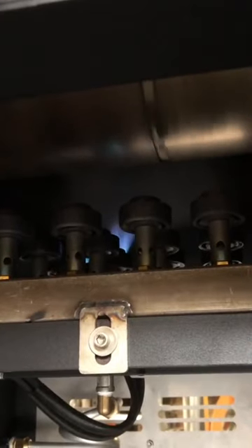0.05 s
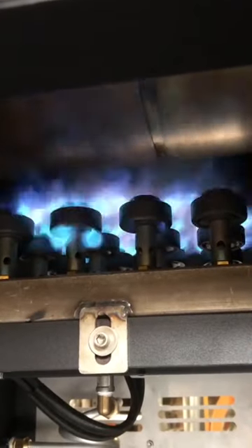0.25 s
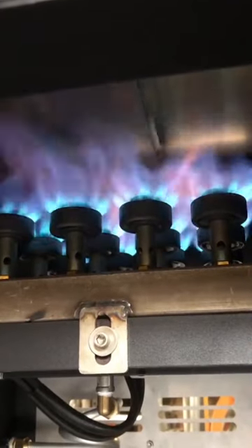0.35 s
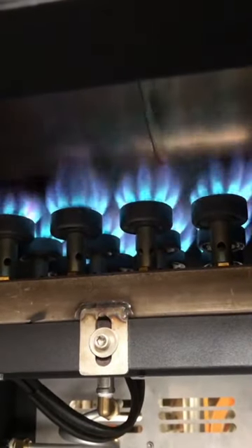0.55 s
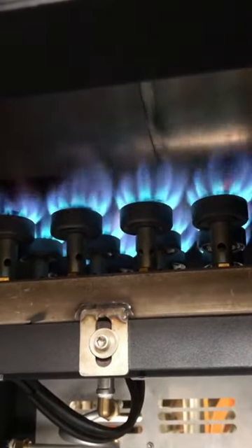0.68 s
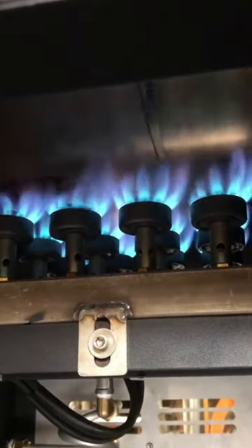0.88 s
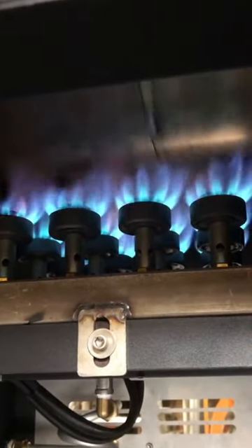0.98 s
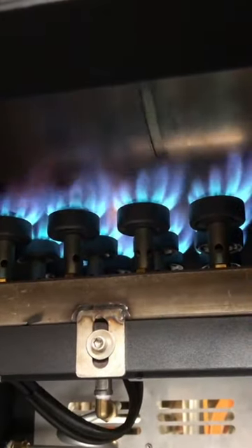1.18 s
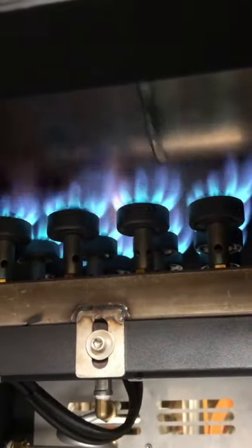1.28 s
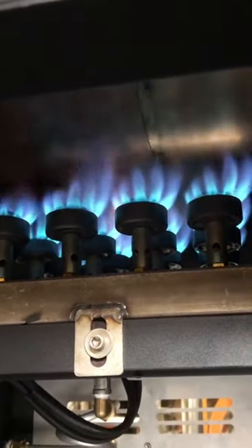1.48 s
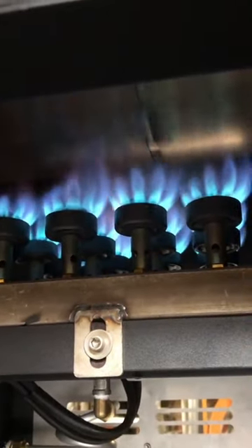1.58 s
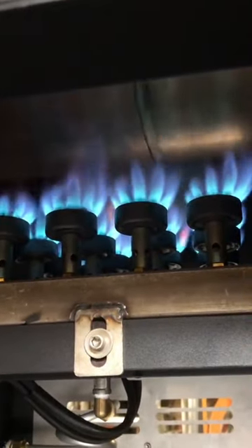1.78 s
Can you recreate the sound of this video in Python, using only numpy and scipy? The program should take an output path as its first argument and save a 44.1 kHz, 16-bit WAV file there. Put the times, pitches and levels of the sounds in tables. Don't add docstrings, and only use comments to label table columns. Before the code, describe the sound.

Gas burners lighting inside a steel cabinet: a loud metallic valve clack with quick rebounds, a fluttering low whump, then a steady low flame roar with faint hiss, over constant fan hum, heard close in mono.

```python
import sys
import numpy as np
from scipy import signal
from scipy.fft import rfft, irfft
from scipy.io import wavfile
from scipy.ndimage import uniform_filter1d, map_coordinates

SR = 44100
rng = np.random.default_rng(int(sys.argv[2]) if len(sys.argv) > 2 else 0)


def file_out(sig):
    cols = np.atleast_2d(sig).T
    lim = np.clip(cols, -1, 1)
    pcm = np.round(lim * 32767).astype(np.int16)
    wavfile.write(sys.argv[1], SR, pcm)


def makeup_ratio(level_db):
    decades = np.asarray(level_db, float) / 20
    return 10 ** decades


N = 81585

# (frequency [Hz], width [Hz], gain [dB])
CABINET_MODES = [(72.9, 7.8, 9.5), (111, 72, -0.5), (182.2, 14.2, -13.5), (204.6, 13, 9.5),
                 (260.4, 17.2, -19.5), (282.7, 23.6, 11.5), (501, 31, 7.5), (646, 7.4, -6)]


def unit(x):
    return x / np.sqrt(np.mean(x ** 2) + 1e-20)


def along(points, hz):
    f, v = np.transpose(points)
    return np.interp(np.log(hz + 1), np.log(f + 1), v)


def wobble(rate_hz):
    return map_coordinates(rng.standard_normal(400), [np.arange(N) * rate_hz / SR])


def rush(spectrum, resonances, patchy_db):
    z = signal.stft(rng.standard_normal(N + 2048), nperseg=512)[2]
    patches = uniform_filter1d(rng.standard_normal(z.shape), size=6, axis=0)
    patches = uniform_filter1d(patches, size=12, axis=1)
    x = signal.istft(z * makeup_ratio(patchy_db * unit(patches)), nperseg=512)[1]
    hz = np.fft.rfftfreq(len(x), 1 / SR)
    db = along(spectrum, hz)
    for centre_hz, width_hz, gain_db in resonances:
        db = db + gain_db / (1 + (2 * (hz - centre_hz) / width_hz) ** 2)
    return unit(irfft(rfft(x) * makeup_ratio(db), len(x))[:N])


def ringing_modes(mode_hz, modes):
    t = np.arange(SR) / SR
    rows = []
    for hz, (db, t60_s, swell_s) in zip(mode_hz, modes):
        decay = makeup_ratio(db + 1.5 * wobble(70)[:SR] - 60 * t / t60_s)
        phase = rng.uniform(0, 2 * np.pi)
        rows.append(decay * (1 - np.exp(-t / swell_s)) * np.sin(2 * np.pi * hz * t + phase))
    return np.array(rows)


def impact_clatter():
    # (frequency [Hz], density [dB per Hz])
    clatter_colour = [(250, -33), (500, -3.5), (1300, -9.5), (2100, -18), (3700, -15), (4400, -26.5),
                      (5600, -6), (14000, -34)]
    # (frequency [Hz], T60 [s])
    clatter_decay = [(400, 0.16), (1500, 0.38), (3500, 0.23), (6000, 0.029), (13000, 0.12)]
    level_db, rise_s = 2.5, 0.0018
    room_db, room_t60_s = -21, 0.33
    t = np.arange(SR) / SR
    hz, frame_s, z = signal.stft(rng.standard_normal((2, SR)), SR, nperseg=128)
    colour_db = along(clatter_colour, hz)[:, None]
    near = makeup_ratio(colour_db - 60 * frame_s / along(clatter_decay, hz)[:, None])
    far = makeup_ratio(colour_db + room_db - 60 * frame_s / room_t60_s)
    clatter = signal.istft(z[0] * near + z[1] * far, SR, nperseg=128)[1][:SR]
    clatter *= makeup_ratio(level_db) / np.std(clatter[:400])
    return clatter * (1 - np.exp(-(t / rise_s) ** 2))


def valve():
    panel_hz = [199, 535, 614, 655, 824, 924, 1204, 1275, 1512, 1610, 1850, 2508, 2884, 3008]
    # (level [dB], T60 [s], swell [s])
    panel_modes = [(-6, 1, 0.03), (-11.5, 0.76, 0.0068), (-4, 0.42, 0.01), (-11, 0.56, 0.017),
                   (-12.5, 0.48, 0.0043), (-2.5, 0.48, 0.014), (-6.5, 0.56, 0.00084), (5, 0.14, 0.0095),
                   (-4.5, 0.14, 0.0098), (-11, 0.46, 0.0052), (-5, 0.096, 0.0027), (-1, 0.14, 0.0014),
                   (-7.5, 0.25, 0.0018), (-0.5, 0.078, 0.00644),]
    plunger_hz = [3450, 3620, 3800, 4920, 5223, 5430, 5570, 5700, 6500, 7400]
    # (level [dB], T60 [s], swell [s])
    plunger_modes = [(-5, .05, .0015), (-5, .04, .0012), (-6.5, .04, .0015), (-18, .12, .002),
                     (-18, .3, .0018), (-16, .2, .0012), (-2, .07, .0016), (-10, .05, .0015),
                     (-12, .06, .0017), (-21, .08, .002)]
    # (time [s], level [dB])
    bounces = [
        (.2085, -12),
        (.2275, -8),
        (.2435, -16),
        (.2715, -24),
    ]
    strike_s, strike_db = 0.199, -16
    hold_s, damped_db, damp_s = 0.047, -7, 0.002
    seat_hz, seat_width_hz = 5500, 600

    t = np.arange(SR) / SR
    panels = ringing_modes(panel_hz, panel_modes)
    plunger = ringing_modes(plunger_hz, plunger_modes)
    damping = 1 / (1 + np.exp(np.clip((hold_s - t) / damp_s, -40, 40)))
    ring = (panels.sum(axis=0) + plunger.sum(axis=0)) * makeup_ratio(damped_db * damping)

    out = np.zeros(N + SR)
    start = round(strike_s * SR)
    out[start:start + SR] = makeup_ratio(strike_db) * (ring + impact_clatter())
    seat = 1 / (1 + ((np.array(plunger_hz) - seat_hz) / seat_width_hz) ** 2)
    for bounce_s, db in bounces:
        excited = makeup_ratio(rng.normal(0, 2.5, len(plunger_hz))) * seat
        out[round(bounce_s * SR):][:SR] += makeup_ratio(strike_db + db) * (excited @ plunger)
    return out[:N]


def whump():
    # (time [s], level [dB], low mode [Hz], upper mode level [dB])
    puffs = [
        (.322, -33, 100, 6),
        (.368, -17, 115, -6),
        (.396, -22, 112, 3),
        (.426, -22, 108, 5),
        (.448, -24, 105, -4),
        (.53, -24, 82, -12),
        (.603, -20, 130, -18),
        (.838, -23, 130, -10),
        (1.243, -22, 122, -10),
        (1.565, -26, 111, -3),
    ]
    # (frequency [Hz], density [dB per Hz])
    puff_colour = [(50, -44), (100, 0), (150, -21), (205, 1.5), (320, -13), (600, -16), (1200, -12),
                   (3000, -69)]
    breathy_db, puff_s, catch_s = -15, 0.009, 0.006
    upper_hz, low_t60_s, upper_t60_s = 206, 0.17, 0.17
    t, out = np.arange(N) / SR, np.zeros(N)
    air = makeup_ratio(breathy_db) * rush(puff_colour, CABINET_MODES, patchy_db=4.5)
    for puff_at_s, db, low_hz, upper_db in puffs:
        u = np.clip(t - puff_at_s, 0, None)
        low = makeup_ratio(4 - 60 * u / low_t60_s) * np.sin(2 * np.pi * low_hz * u)
        upper = makeup_ratio(upper_db - 60 * u / upper_t60_s) * np.sin(2 * np.pi * upper_hz * u)
        boom = (low + upper) * (1 - np.exp(-u / catch_s))
        breath = air * np.exp(-0.5 * ((t - puff_at_s) / puff_s - 0.6) ** 2)
        out += makeup_ratio(db) * (boom + breath)
    return out


def flames():
    # (time [s], roar [dB], jet hiss [dB])
    burn = [(0.239, -48, -60), (.3, -37.5, -38), (.35, -28, -38.5), (0.391, -28, -39.5),
            (0.427, -27.5, -36.5), (0.462, -30, -46.5), (.51, -29, -47.5), (0.622, -28.5, -40.5),
            (.78, -31.5, -47.5), (1.1, -29.5, -51), (1.5, -29, -49), (1.85, -30, -46.5)]
    # (frequency [Hz], density [dB per Hz])
    roar_colour = [(15, -50), (25, -29), (114, 5), (178, -6.5), (286, -13), (419, -19), (498, -13),
                   (548, -28), (1100, -46), (1430, -79), (2420, -120)]
    # (frequency [Hz], density [dB per Hz])
    hiss_colour = [(300, -19.5), (700, -0.5), (1500, -5), (2700, -15.5), (4000, -22.5), (5000, -22),
                   (6200, -35.5), (14000, -66.5)]
    # (frequency [Hz], width [Hz], gain [dB])
    ports = [(906, 120, -5.5), (1077, 210, -17.5), (1900, 210, -10.5), (1980, 84, 10.5), (2506, 190, 6),
             (4700, 367, -0.5), (8800, 910, 12.5), (12300, 1400, 0)]
    flutter_db, flutter_hz = 0.87, 28.42
    billow_db, billow_hz = 0.63, 6.27
    burn_s, roar_db, hiss_db = np.transpose(burn)
    t = np.arange(N) / SR
    flutter = flutter_db * wobble(flutter_hz) + billow_db * wobble(billow_hz)
    roar = unit(makeup_ratio(flutter) * rush(roar_colour, CABINET_MODES, patchy_db=0.5))
    hiss = unit(makeup_ratio(0.67 * flutter) * rush(hiss_colour, ports, patchy_db=1.2))
    roar = makeup_ratio(np.interp(t, burn_s, roar_db)) * roar
    hiss = makeup_ratio(np.interp(t, burn_s, hiss_db)) * hiss
    lit = t > burn_s[0]
    return lit * (roar + hiss)


def fan():
    # (frequency [Hz], density [dB per Hz])
    fan_colour = [(25, -24), (95, 2.5), (250, -6.5), (600, -4), (1300, -21), (2900, -25.5), (5500, -47),
                  (14000, -54)]
    # (frequency [Hz], width [Hz], gain [dB])
    duct = [(170, 56, -6), (249, 80, 10), (699, 67, -12.5), (935, 135, 5.5), (1547, 400, 6.5),
            (1750, 120, -2.5), (4880, 330, 10)]
    # (frequency [Hz], level [dB rms])
    motor = [(393, -50.5), (1690, -61), (1820, -65), (1950, -58), (12005, -83)]
    air_db, waver_db, drift_hz = -37.5, 0.8, 1
    t = np.arange(N) / SR
    out = makeup_ratio(air_db) * rush(fan_colour, duct, patchy_db=1.14)
    for hz, db in motor:
        level = np.sqrt(2) * makeup_ratio(db + waver_db * wobble(11.0))
        drift_cycles = np.cumsum(drift_hz * wobble(5.74)) / SR
        out += level * np.sin(2 * np.pi * (hz * t + drift_cycles))
    return out


def scene():
    return (valve() + whump() + flames() + fan())[None]


def top_cut(x):
    return signal.sosfilt(signal.butter(12, 13970, fs=SR, output="sos"), x)


def record(dry):
    low_hz, top_hz = 43.2, 15800
    hz = np.fft.rfftfreq(2 * N, 1 / SR)
    response = (hz < top_hz) * hz ** 2 / (hz ** 2 + low_hz ** 2)
    heard = irfft(rfft(dry, 2 * N) * response, 2 * N)[:, :N]
    return top_cut(heard)


dry = scene()
out = record(dry)
file_out(out)
```